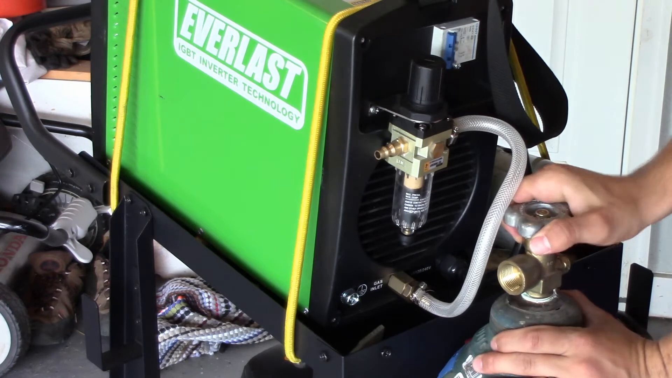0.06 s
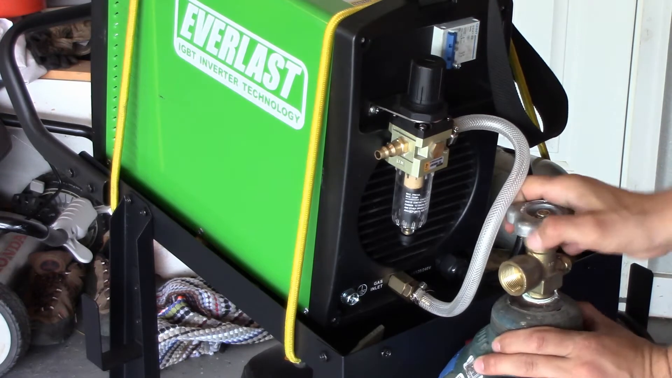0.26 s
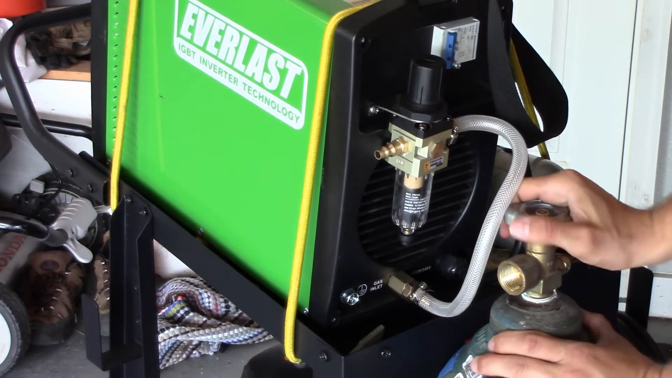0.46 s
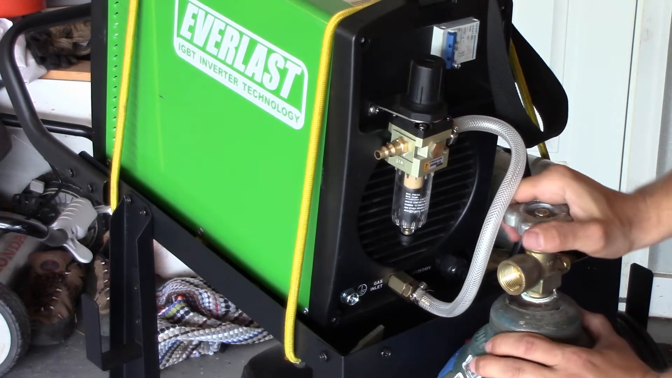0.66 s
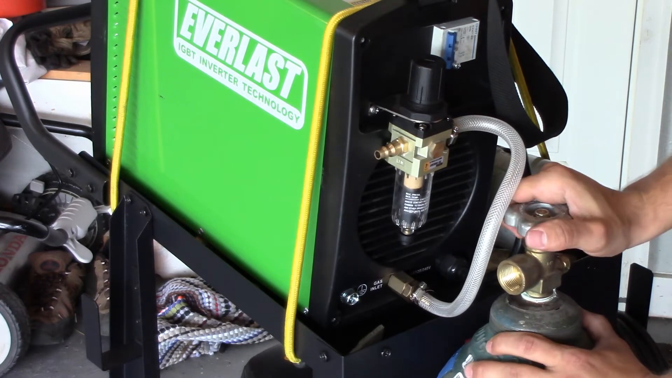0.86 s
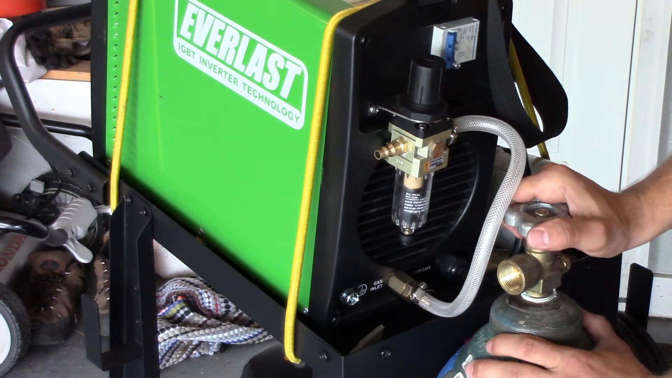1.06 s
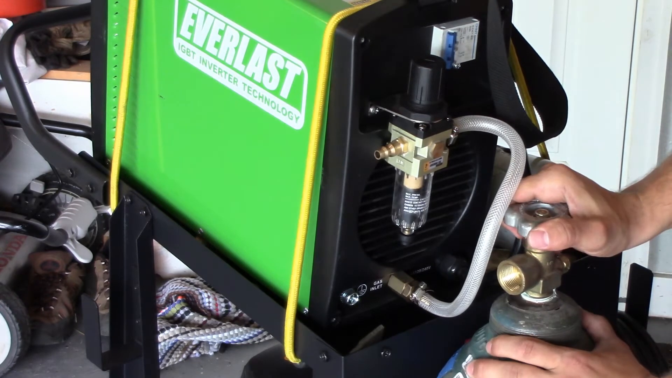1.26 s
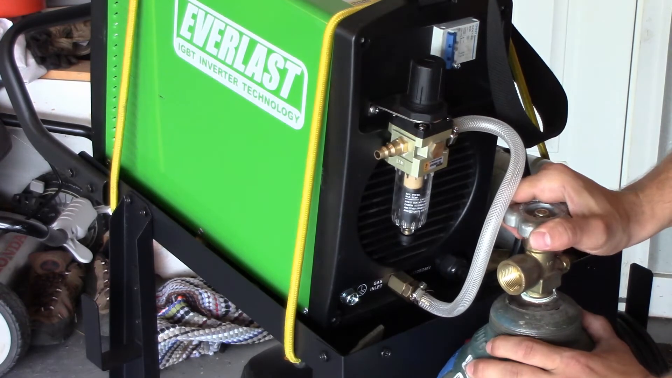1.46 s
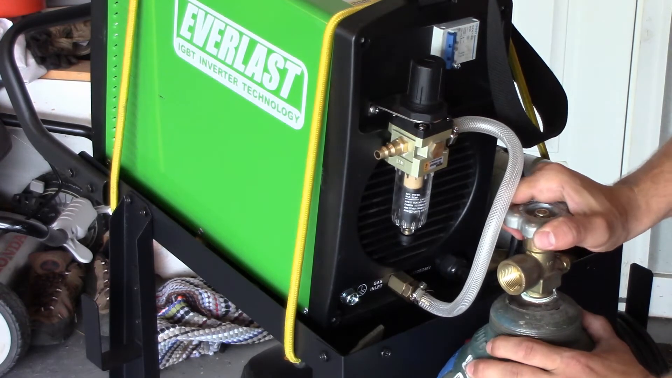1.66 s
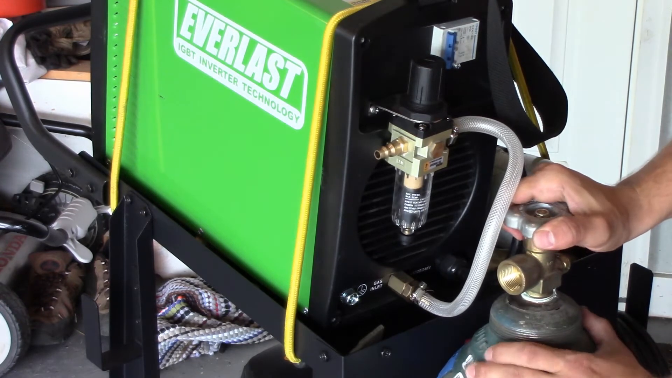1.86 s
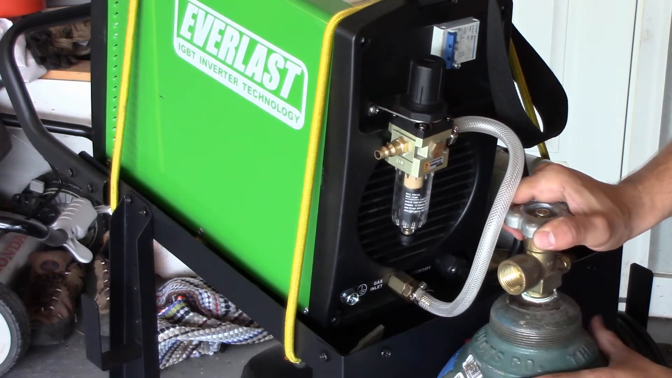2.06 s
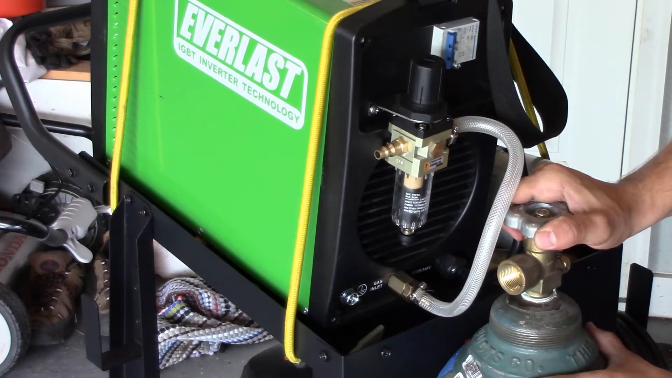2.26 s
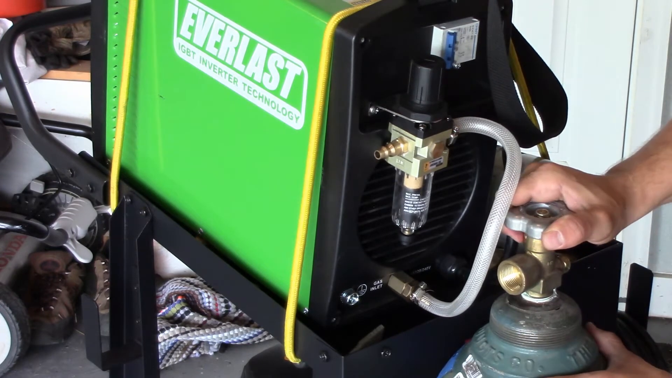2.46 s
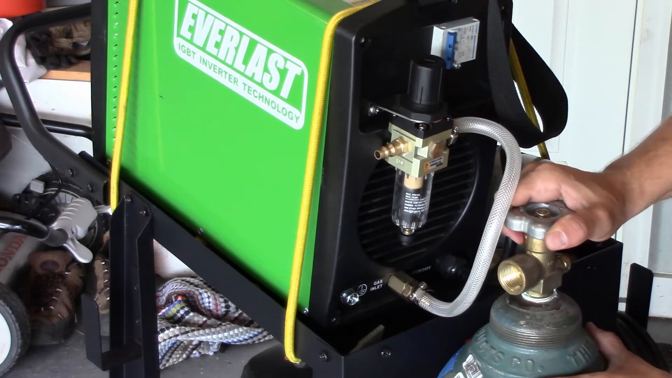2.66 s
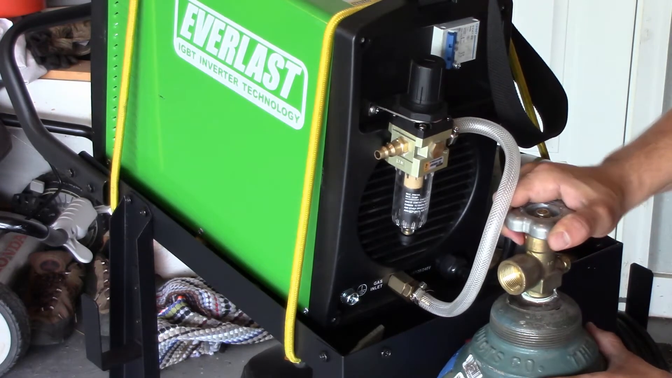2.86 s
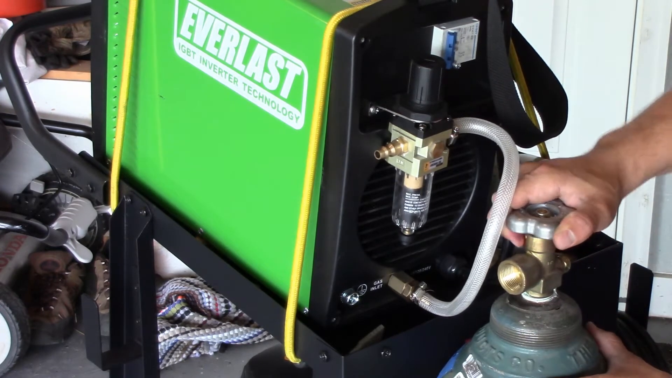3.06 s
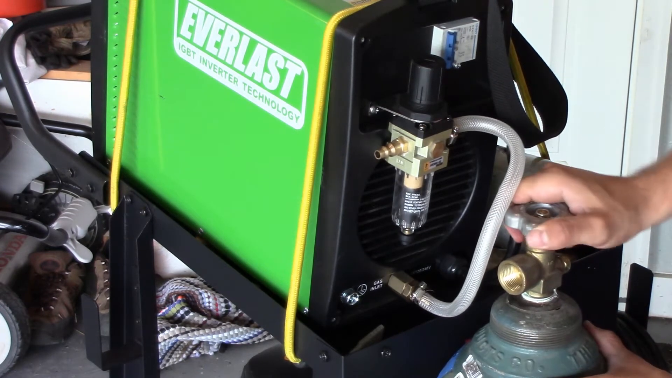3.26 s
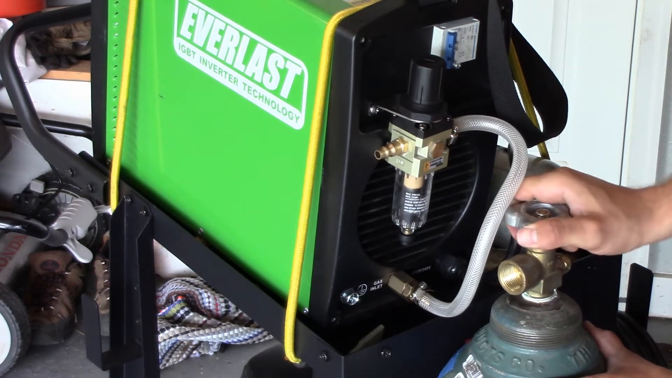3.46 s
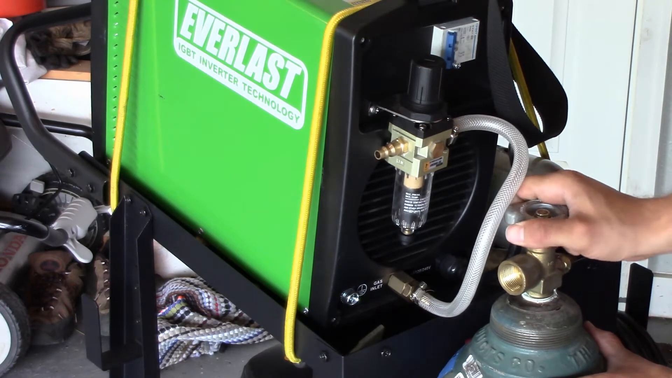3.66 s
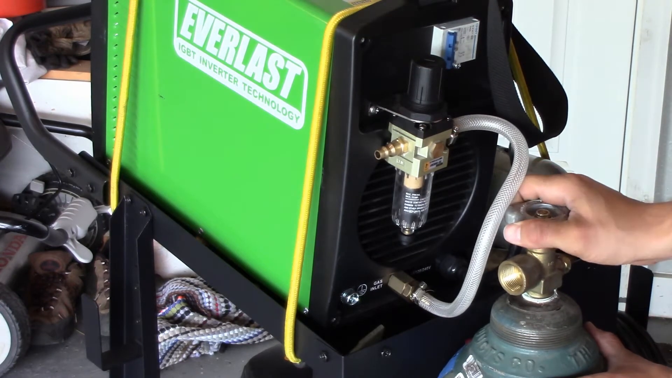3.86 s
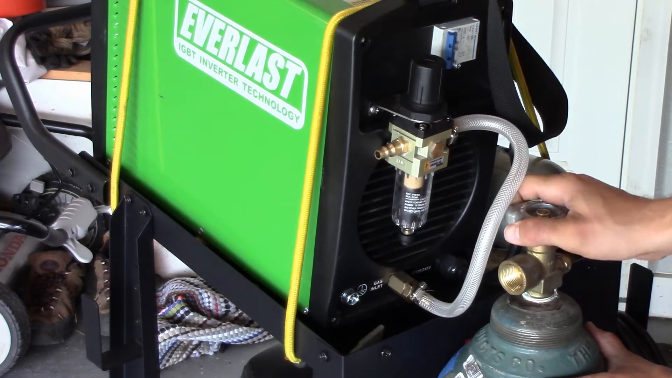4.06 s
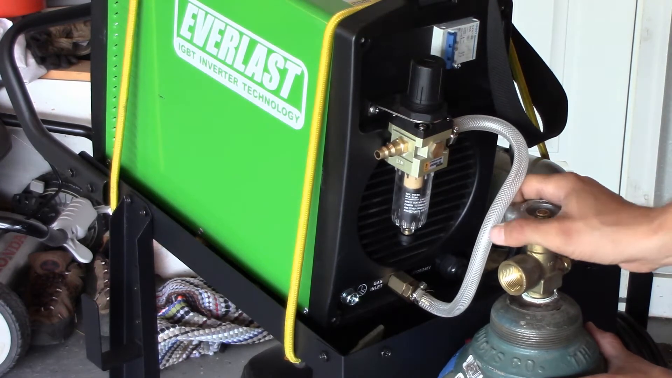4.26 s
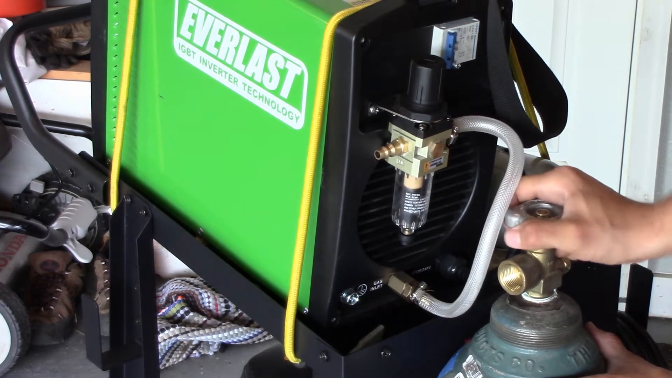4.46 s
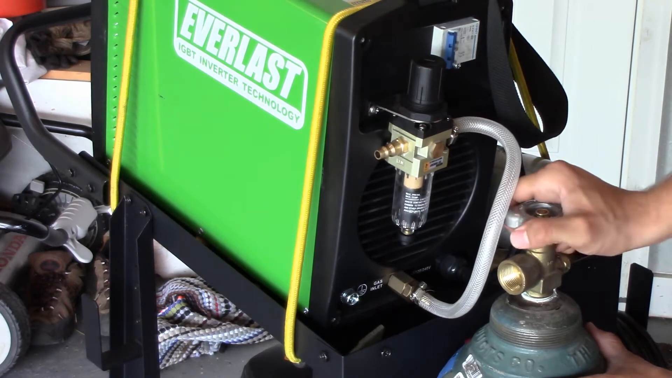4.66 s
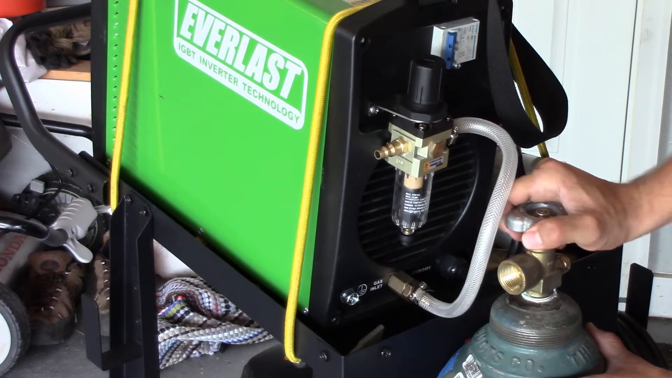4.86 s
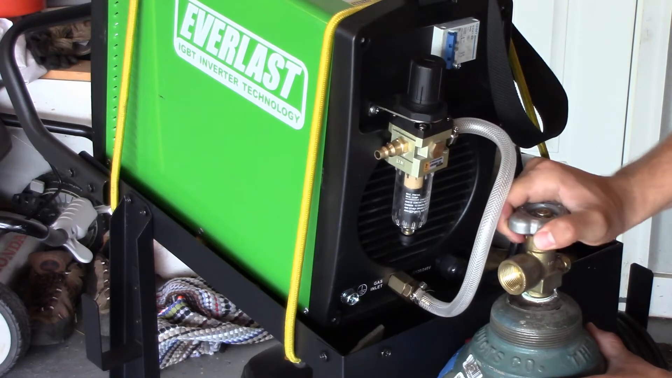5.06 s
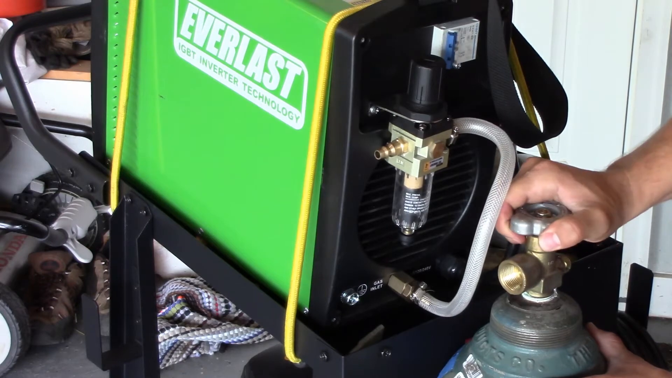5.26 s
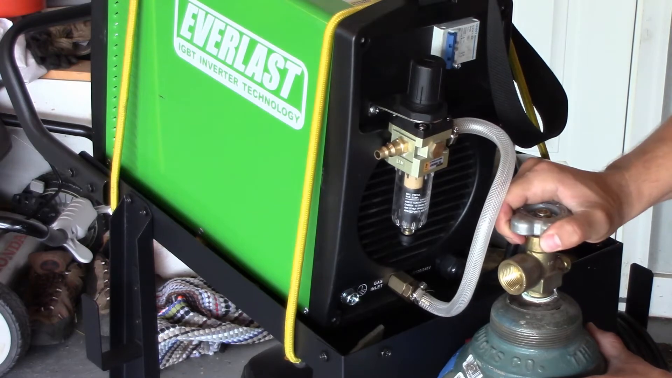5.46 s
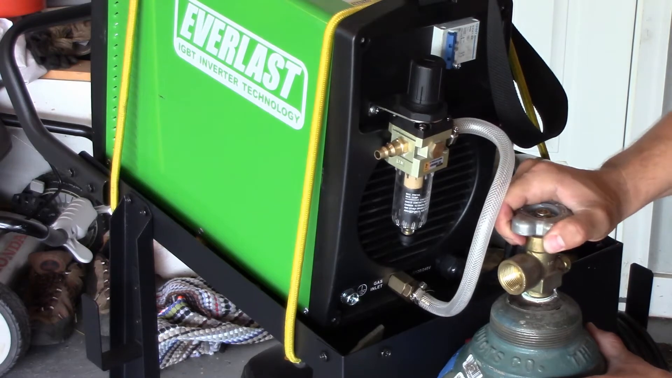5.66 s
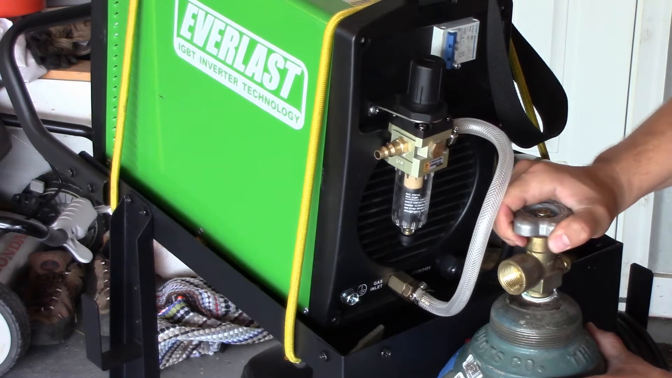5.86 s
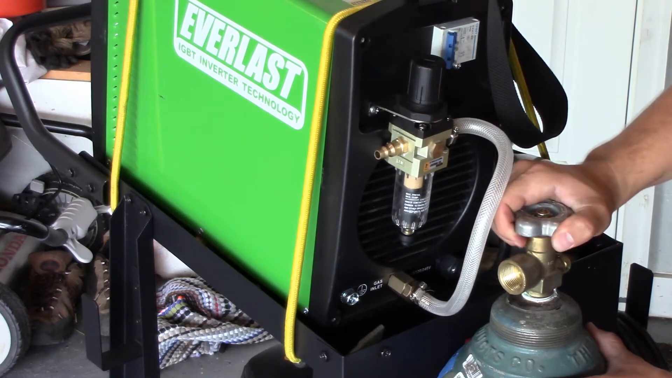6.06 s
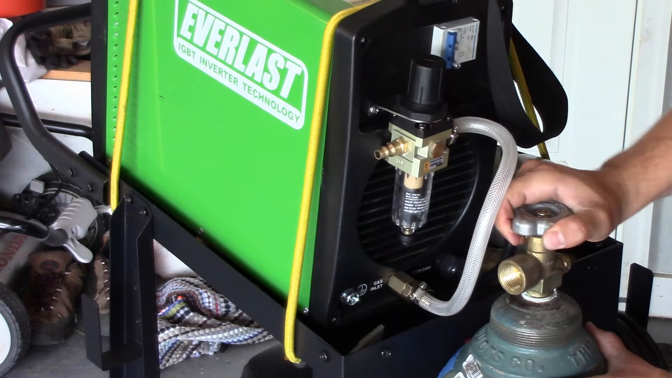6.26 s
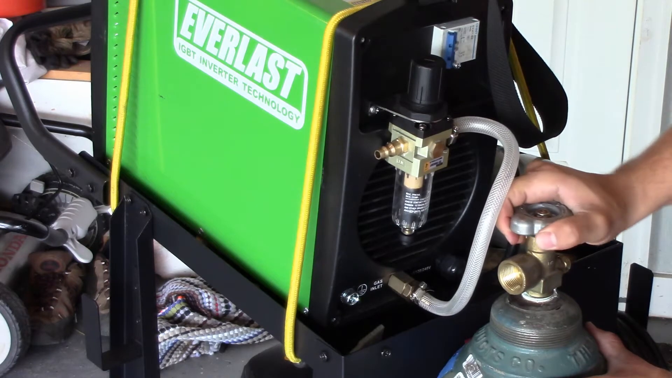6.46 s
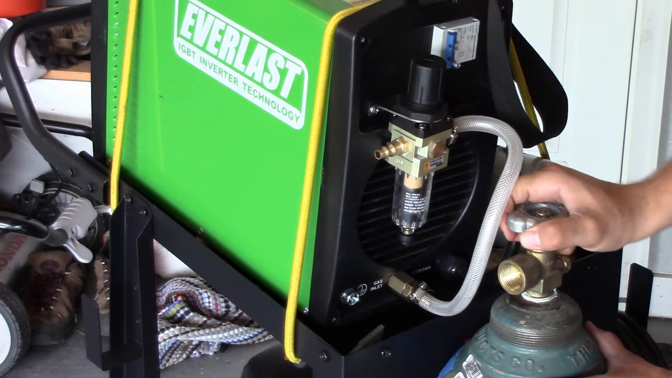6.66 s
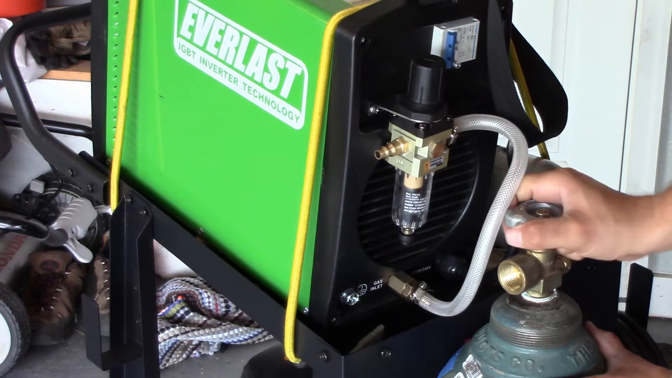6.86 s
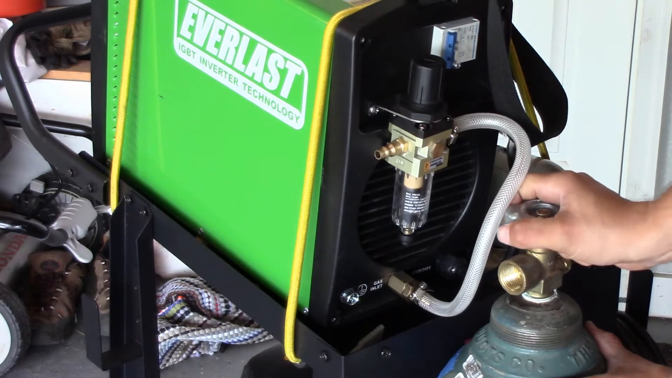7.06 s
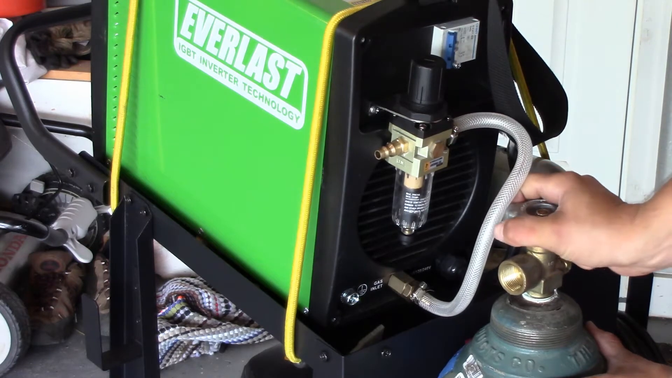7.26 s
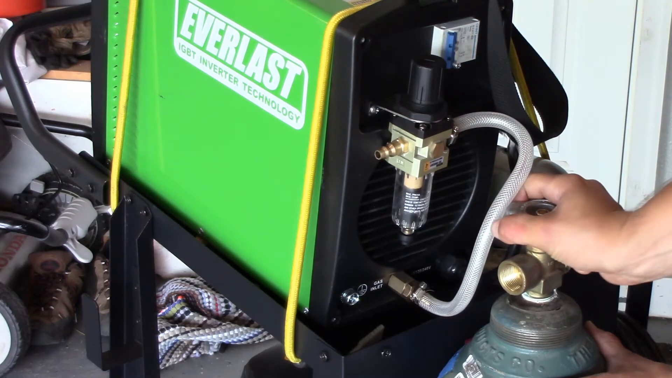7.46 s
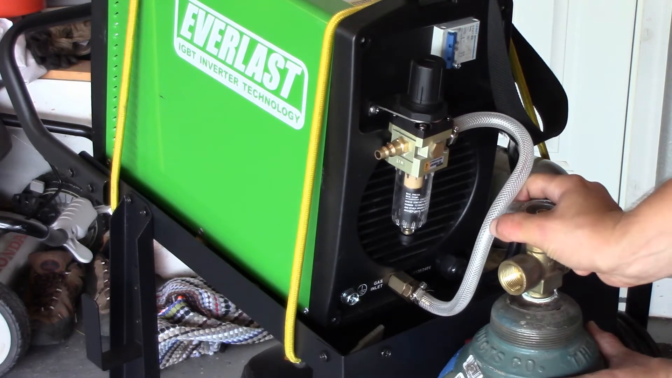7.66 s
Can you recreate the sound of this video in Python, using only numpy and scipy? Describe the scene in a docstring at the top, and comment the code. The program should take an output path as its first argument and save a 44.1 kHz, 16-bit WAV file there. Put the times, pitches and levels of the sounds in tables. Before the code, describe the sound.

Low garage hum with faint chirps, skin rubbing and ticks on metal, then three harsh ringing gas jets from a brass cylinder valve, the middle one very brief.

```python
"""Gas valve in a garage

A hand opens the valve of a gas cylinder three times; each jet is noise that rings the brass outlet.
Before that the hand rubs on the wheel: grainy noise with ticks. A machine hums in sine tones over
rumble and air noise, and birds chirp outside as narrow bands of noise that slide in pitch.
A limiter and a gain control hold the loud jet down, so the hum sinks while the valve is wide open."""
import sys
import numpy as np
from scipy import signal
from scipy.fft import rfft, irfft, next_fast_len
from scipy.io import wavfile
from scipy.ndimage import uniform_filter1d

SR = 44100
rng = np.random.default_rng(int(sys.argv[2]) if len(sys.argv) > 2 else 0)


def voltage_ratio(level):
    """Linear amplitude factor for a level in decibels (scalar or array-like)."""
    return 10 ** (np.asarray(level, float) / 20)


def output_pcm(signal):
    """Save a mono or channel-first signal as 16-bit PCM at the path in sys.argv[1].

    Samples are clipped to [-1, 1] before scaling.
    """
    pcm = np.clip(np.atleast_2d(signal).T, -1, 1) * 32767
    wavfile.write(sys.argv[1], SR, np.round(pcm).astype(np.int16))


N = 340361  # samples in the scene

# Levels are those of the sources, before the room and the gain controls. Colours are relative.
# thin whistles, perhaps birds; the one at 4.8 s is the valve seat just before its jet:
# t/s, length/s, level/dB, start f/Hz, end f/Hz
WHISTLES = [(0, 0.053, -59, 3940, 3820), (0.023, 0.18, -61, 4570, 4480), (1.325, 0.047, -59, 4540, 4620),
            (1.718, 0.089, -65, 3080, 3100), (1.86, 0.11, -56, 4250, 4150), (1.95, 0.045, -50, 4120, 4080),
            (2.0, 0.093, -58, 3420, 3370), (2.085, 0.032, -55, 2800, 2730), (2.275, .19, -60, 2450, 2250),
            (4.097, 0.095, -57, 2460, 2300), (4.316, 0.077, -55, 2190, 2250),
            (4.802, 0.13, -58, 3500, 3400)]
# hoarse chirps, mostly falling: t/s, length/s, level/dB, start f/Hz, end f/Hz
CHIRPS = [(1.34, 0.085, -50, 4070, 3370), (1.86, 0.083, -47.5, 3600, 3400), (1.95, .045, -45, 3820, 3550),
          (1.995, 0.041, -43, 3380, 3370), (2.06, 0.082, -59, 3380, 3240), (4.57, .035, -45, 3020, 3050)]

# strength of the hum, the shaft's second order: t/s, level/dB
HUM = [(0, -42.5), (1.1, -40.5), (1.65, -46.5), (2.3, -39.5), (3.6, -38.5), (4.2, -31), (5.1, -32),
       (5.47, -35.5), (5.75, -27.5), (6.9, -34.5), (7.3, -29.5), (7.72, -34)]
# weaker orders of the shaft: multiple of its speed, level/dB
WEAK_ORDERS = [(1, -72), (3, -49), (4, -48.5), (6, -62), (10, -58)]
# times when the rumble swells: t/s, length/s, level/dB
RUMBLE_SWELLS = [(1.8, .25, -44), (2.15, 0.47, -41), (3.3, 0.63, -51), (7.0, 0.87, -46)]
# colour of the rumble: f/Hz, level per Hz/dB
RUMBLE_COLOUR = [(25, -21), (40, 17), (50, 17), (63, 3.5), (90, 18), (130, 15.5), (200, -58)]
# fuzzy tones of the machine: f/Hz, width/Hz, level/dB
FUZZY_TONES = [(541, 96, -56.5), (770, 58, -51), (1038, 18, -54.5), (1131, 33, -58), (3600, 170, -76)]
# colour of the steady wash in the garage: f/Hz, level per Hz/dB
AIR_COLOUR = [(24, -24.5), (40, -21), (91, 5), (162, -13.5), (208, -3.5), (281, -10), (500, -14),
              (1170, -15), (1700, -19.5), (2300, -23), (3900, -24), (4700, -34.5), (7000, -40.5),
              (15700, -50)]
SHAFT_HZ = 51.35
RUMBLE_DB, AIR_DB = -47, -42.5  # steady parts
TONES_FADE_DB_PER_S = -2.27

# small ticks of wheel and valve: t/s, peak level/dB, f/Hz, cycles to die away by a factor e
TICKS = [(.016, -32, 8300, 1.2), (0.23, -13.5, 1510, 2.5), (0.279, -15, 3000, 0.3), (.355, -42, 12900, 1.5),
         (0.938, -37, 3920, 1), (2.435, -45, 3500, 2), (4.535, -47, 7000, 2.3), (4.575, -41, 3220, 4.4),
         (4.592, -44, 3300, 6.8), (4.635, -29, 5550, 2.2), (4.958, -2, 900, 0.075)]
# hand sliding on the wheel: t/s, length/s, skin hiss level/dB, dull scrape level/dB
STROKES = [(0.144, .24, -37.5, -39), (0.416, 0.16, -43, -45.5), (0.56, 0.22, -32.5, -35),
           (0.872, 0.11, -38, -49), (1.81, .35, -50.5, -67), (4.545, 0.071, -49, -59)]
# the grip catches and the scrape swells: t/s, length/s, level/dB
BITES = [(0.221, 0.11, -29.5), (0.645, 0.03, -34)]
# colour of the dull scrape: f/Hz, level per Hz/dB
SCRAPE_COLOUR = [(200, -18), (500, -8), (1000, -3.5), (1400, 0.5), (1900, -8), (3000, -34)]
# colour of the skin's hiss: f/Hz, level per Hz/dB
SKIN_COLOUR = [(1200, -36), (2000, -3), (2800, -2.5), (3600, 2.5), (4600, -6.5), (9600, -19.5),
               (13000, -21), (15700, -31)]
STROKE_POWER, BITE_RISE_S = 1.02, 0.006

# the wheel turns evenly open, is held, and turns evenly shut:
# t/s, opening/s, held/s, closing/s, full jet level/dB, widest colour share (0-1)
BURSTS = [(2.632, 0.33, 0.3, 0.26, 12, 0.93), (4.851, 0.032, 0.0089, 0.26, -1, 0.38),
          (5.59, 0.37, 0.5, 0.32, 16.5, 0.94)]
# colour of the jet with the valve barely cracked: f/Hz, level per Hz/dB
CRACKED = [(100, -34), (450, -36.5), (960, -25), (1900, -22), (2300, -16), (2700, -0.5), (3570, 1.5),
           (4000, -8.5), (4900, -20), (7700, -28), (8400, -18.5), (9700, -24), (10200, -24), (10800, -23),
           (11900, -22.5), (12600, -33), (15700, -37.5)]
# colour of the jet with the valve wide open: f/Hz, level per Hz/dB
WIDE = [(100, -43), (280, -22), (460, -25), (1190, -14), (2100, -7.5), (3010, 3), (3650, -1.5),
        (5120, -12.5), (7980, -13), (9250, -6.5), (10100, -12.5), (12000, -9.5), (13000, -13.5),
        (14500, -12), (15700, -24)]
# narrow rings of the brass outlet and the casing beside it: f/Hz, width/Hz, level/dB among the rings
OUTLET_RINGS = [(2300, 7.3, -45), (2590, 9, 11), (2840, 51, 0), (3070, 42, 5), (3040, 48, 3),
                (3375, 12, -3), (3530, 30, 13.5), (3530, 72, -20), (3676, 11, 10.5), (3750, 18, -23),
                (4200, 10, -7.5), (6180, 27, -8.5), (8900, 77, -9), (12130, 97, -30)]
OPENING_POWER, CLOSING_POWER, SHUT_DB = 2.55, 1.93, -77  # jet amplitude is a power of the wheel's turn
JUMP_S, SURGE_DB, SURGE_S = 0.024, 3, 0.03  # jump to the wide colour, with a brief surge
THREAD, CREEP, NARROWED = -0.36, 0.35, 0.4  # colour share at first crack, before the jump, at shutting
GUST_DB = 1.5  # unsteady flow, rms

# a band of hiss sweeps up as the valve jumps wide open:
# t/s, length/s, level/dB, start f/Hz, end f/Hz
SWEEPS = [(2.94, 0.079, 1, 5700, 8090), (5.97, 0.075, 4.5, 5550, 7640)]
# low puffs: two as the flow jumps, one under the knock at 4.958 s: t/s, level/dB, t60/s, top f/Hz
PUFFS = [(2.967, -9, 0.44, 1200), (4.958, -29, 0.17, 890), (5.982, -23, .25, 1600)]
# thin sizzle past the seat while the valve is not quite shut: t/s, level/dB
LEAK = [(5.05, -67), (5.15, -74), (5.3, -54), (5.45, -52.5), (5.58, -52.5), (5.66, -60)]
# bands of that sizzle: f/Hz, width/Hz, level/dB
LEAK_BANDS = [(3280, 890, -5.5), (8440, 940, -13), (10700, 3300, -18.5)]

# echoes from near surfaces: delay t/s, level/dB
ECHOES = [(.0041, -18.5), (.0046, -24), (.008, -19), (.0098, -12.5)]
# how long the garage rings: f/Hz, t60/s
GARAGE = [(300, 0.18), (1300, 0.66), (3500, 0.64), (9000, 0.51), (15000, 0.35)]
# smeared side signal against the middle: f/Hz, level/dB
SPREAD = [(60, -30), (150, -40.5), (300, -20.5), (700, -26), (1400, -39.5), (3000, -35), (6000, -30),
          (10000, -26.5), (14000, -17), (15700, -17)]
EDGE_HZ = 15760  # top of the band


def evened(x):
    """Scales a sound to rms 1."""
    return x / np.sqrt(np.mean(x ** 2) + 1e-20)


def read(points, hz):
    """Reads a curve between its points, on a logarithmic pitch scale."""
    f, value = np.transpose(points)
    return np.interp(np.log(hz + 1), np.log(f + 1), value)


def along(rows, t):
    """Reads every column of a table at the times t."""
    s, *columns = np.transpose(rows)
    return [np.interp(t, s, c) for c in columns]


def add(mix, s, sound):
    """Adds a sound into the mix at s seconds."""
    part = mix[round(s * SR):][:len(sound)]
    part += sound[:len(part)]


def resonate(x, hz, width):
    """Shifts the curve hz down to zero, smooths, and shifts back: a resonance of gain 1."""
    turn = np.exp(2j * np.pi * np.cumsum(hz * np.ones(len(x))) / SR)
    r = np.exp(-np.pi * width / SR)
    return 2 * (turn * signal.lfilter([1 - r], [1, -r], x / turn)).real


def wander(hz):
    """Slow chance of rms 1."""
    smooth = uniform_filter1d(rng.standard_normal(N), round(SR / hz / 4))
    return evened(signal.lfilter([1], [1, -np.exp(-2 * np.pi * hz / SR)], smooth))


def noise(colour_db, samples, patchy_db, size=512):
    """Random short-time spectra shaped by colour_db(hz, t), with drifting patches; rms 1 overall."""
    frames, hz = samples * 4 // size + 5, np.fft.rfftfreq(size, 1 / SR)
    a, b, patches = rng.standard_normal((frames, len(hz), 3)).T
    patches = evened(uniform_filter1d(uniform_filter1d(patches, 6, 0), 20, 1))
    t = np.arange(frames) * size / 4 / SR
    shape = voltage_ratio(colour_db(hz[:, None], t)) * np.ones(a.shape)
    shape = shape / np.linalg.norm(shape, axis=0)  # every moment equally strong before the patches
    spectra = (a + 1j * b) * shape * voltage_ratio(patchy_db * patches)
    return evened(signal.istft(spectra, nperseg=size, noverlap=size * 3 // 4)[1][:samples])


def still(points):
    """A colour that stays the same all the time."""
    return lambda hz, t: read(points, hz)


def narrow_noise(samples, hz, width):
    """Noise heard through two equal resonances in a row, at rms 1."""
    once = resonate(rng.standard_normal(samples), hz, width)
    return evened(resonate(once, hz, width))


def bands(table, samples):
    """Sums steady bands of noise."""
    return sum(voltage_ratio(db) * narrow_noise(samples, hz, width) for hz, width, db in table)


def glide(table, width):
    """Short bands of noise that slide from one pitch to another."""
    out = np.zeros(N)
    for s, length, db, start_hz, end_hz in table:
        hz = np.linspace(start_hz, end_hz, round(length * SR))
        band = narrow_noise(len(hz), hz, width)
        add(out, s, voltage_ratio(db) * band * signal.windows.tukey(len(hz), 0.4))
    return out


def swells(table, power):
    """Smooth humps over the whole scene, from rows of start, length and level."""
    out = np.zeros(N)
    for s, length, db in table:
        t = np.arange(0, length, 1 / SR)
        add(out, s, voltage_ratio(db) * abs(np.sin(np.pi * t / length)) ** power)
    return out


def chirps_and_whistles():
    """Birds' hoarse chirps as a fuzzy, throbbing resonance; thin whistles, one from the seat, as narrow ones."""
    throb = 1 + 0.14 * np.sin(2 * np.pi * 34 * np.arange(N) / SR)
    return glide(WHISTLES, 90) + throb * glide(CHIRPS, 600)


def machine():
    """Shaft orders on a slightly wavering speed, each fluttering on its own, over rumble and air noise."""
    t = np.arange(N) / SR
    speed_hz = SHAFT_HZ * (1 + 0.00373 * wander(3.03))
    angle = 2 * np.pi * np.cumsum(speed_hz) / SR
    out = voltage_ratio(along(HUM, t)[0] + 1.1 * wander(2.3)) * np.sin(2 * angle)
    for multiple, db in WEAK_ORDERS:
        flutter = voltage_ratio(db + 1.8 * wander(6.3))
        out += flutter * np.sin(multiple * angle + 2 * np.pi * rng.random())
    rumble = noise(still(RUMBLE_COLOUR), N, patchy_db=0, size=4096)
    out += (voltage_ratio(RUMBLE_DB) + swells(RUMBLE_SWELLS, 1.25)) * rumble
    out += voltage_ratio(TONES_FADE_DB_PER_S * t) * bands(FUZZY_TONES, N)
    return out + voltage_ratio(AIR_DB) * noise(still(AIR_COLOUR), N, patchy_db=-0.64, size=2048)


def hand():
    """Skin drags over metal: a grainy dull scrape and a finer hiss, with ticks."""
    grain = voltage_ratio(2.0 * evened(uniform_filter1d(rng.standard_normal(N), 60)))  # stick and slip
    scrape = noise(still(SCRAPE_COLOUR), N, patchy_db=3.0)
    skin = noise(still(SKIN_COLOUR), N, patchy_db=1.0)
    scrape_level = swells([(s, length, db) for s, length, _, db in STROKES], STROKE_POWER)
    skin_level = swells([row[:3] for row in STROKES], STROKE_POWER)
    for s, length, db in BITES:
        t = np.arange(0, length, 1 / SR)
        add(scrape_level, s, voltage_ratio(db) * np.minimum(t / BITE_RISE_S, 1) * (1 - (t / length) ** 2))
    out = evened(grain) * (scrape_level * scrape + skin_level * skin)
    for s, db, hz, cycles in TICKS:
        turns = np.arange(1000) / SR * hz
        tick = np.sin(2 * np.pi * turns) * np.exp(-turns / cycles)
        add(out, s, -voltage_ratio(db) * tick / tick.max())
    return out


def jet(open_s, held_s, close_s, full_db, widest):
    """Turbulent noise that broadens as the valve opens and rings the outlet."""
    total_s = open_s + held_s + close_s
    t = np.arange(0, total_s, 1 / SR)
    knots = np.cumsum([0, max(open_s - 0.42 * JUMP_S, open_s / 2), JUMP_S])

    def left(s):  # share of the wheel's turn still open while closing
        return np.clip((total_s - s) / close_s, 0, 1)

    def colour(hz, s):
        widening = np.interp(s, knots, [THREAD, CREEP, widest])
        narrowing = NARROWED + (widest - NARROWED) * left(s) ** 0.44
        share = np.minimum(widening, narrowing)
        return read(CRACKED, hz) + share * (read(WIDE, hz) - read(CRACKED, hz))

    hiss = noise(colour, len(t), patchy_db=1.67)
    rings = sum(voltage_ratio(db) * evened(resonate(hiss, hz, width)) for hz, width, db in OUTLET_RINGS)
    flow = np.minimum(t / open_s, 1) ** OPENING_POWER * left(t) ** CLOSING_POWER
    surge_db = SURGE_DB * np.exp(-((t - open_s) / SURGE_S) ** 2)
    gust_db = GUST_DB * wander(14.2)[:len(t)]
    level = voltage_ratio(SHUT_DB) + voltage_ratio(full_db + surge_db + gust_db) * flow
    return level * evened(hiss + voltage_ratio(-10.0) * evened(rings))


def seat():
    """The leak past the valve seat, sweeps when the flow jumps, and low puffs at two jumps and one knock."""
    out = glide(SWEEPS, 1900)
    t = np.arange(LEAK[0][0], LEAK[-1][0], 1 / SR)
    add(out, t[0], voltage_ratio(along(LEAK, t)[0]) * evened(bands(LEAK_BANDS, len(t))))
    t = np.arange(SR // 2) / SR
    for s, db, t60, top_hz in PUFFS:
        low_band = signal.butter(2, [130, top_hz], "band", fs=SR, output="sos")
        puff = evened(signal.sosfilt(low_band, rng.standard_normal(len(t))))
        add(out, s, voltage_ratio(db - 60 * t / t60) * np.minimum(t / 0.0023, 1) * puff)
    return out


def tail():
    """Sparse taps of random sign, one in every 20 samples, each band dying at its own speed."""
    taps, at = np.zeros(SR), np.arange(500, SR - 20, 20)
    taps[at + rng.integers(0, 20, len(at))] = rng.choice([-1., 1.], len(at))
    hz, t, z = signal.stft(taps, SR, nperseg=256)
    out = signal.istft(z * voltage_ratio(-60 * t / read(GARAGE, hz)[:, None]), SR, nperseg=256)[1]
    return out / np.linalg.norm(out)


def garage(x):
    """Direct sound, near echoes and the tail, scaled together to unit energy."""
    room = voltage_ratio(-12.5) * tail()
    room[0] = 1
    for s, db in ECHOES:
        room[round(s * SR)] += voltage_ratio(db)
    return signal.fftconvolve(x, room / np.linalg.norm(room))[:N]


def scene():
    """Everything is near the middle; a faint smeared copy makes the side."""
    near = chirps_and_whistles() + hand() + seat()
    for start, *turning in BURSTS:
        add(near, start, jet(*turning))
    near = garage(near)
    mid = near + machine()
    size = next_fast_len(N + SR)
    smear = rfft(tail()[500:2500], size)
    smear = smear / np.sqrt(np.mean(abs(smear) ** 2))
    smear = smear * voltage_ratio(read(SPREAD, np.fft.rfftfreq(size, 1 / SR)))
    side = irfft(rfft(mid, size) * smear, size)[:N]
    side = side - 0.054 * near  # all but the machine sits a touch right
    return np.array([mid + side, mid - side])


def excess(power_db, knee_db, recovery_db):
    """dB above the knee, caught at once and let go at recovery_db a second."""
    fall = np.arange(N) * recovery_db / SR
    return np.maximum(np.maximum.accumulate(power_db + fall) - fall - knee_db, 0)


def roll_off(x):
    """The treble ends steeply here."""
    return signal.sosfilt(signal.butter(12, 16550, fs=SR, output="sos"), x)


def record(dry):
    """A quick limiter that hears treble more strongly, a sluggish gain control, hiss, soft clip, band edge."""
    sensed = signal.lfilter([1, -0.45], [1], dry.mean(0))
    power_db = 10 * np.log10(abs(uniform_filter1d(sensed ** 2, 900)) + 1e-12)
    quick_db = 0.97 * uniform_filter1d(excess(power_db, knee_db=-13.0, recovery_db=150.), 300)
    lag = np.exp(-1 / (0.4 * SR))  # the slow control follows over 0.4 s
    slow_excess = excess(power_db - quick_db, knee_db=-30.5, recovery_db=100.)
    slow_db = 0.12 * signal.lfilter([1 - lag], [1, -lag], slow_excess)
    held = dry / voltage_ratio(quick_db + slow_db)
    held = held + voltage_ratio(-62) * rng.standard_normal(dry.shape)  # each channel has its own preamp hiss
    clipped = held / (1 + (held / 0.95) ** 6) ** (1 / 6)
    edge = signal.firwin(511, EDGE_HZ, window=("kaiser", 11), fs=SR)
    mix = signal.oaconvolve(clipped, edge[None], "same")
    return roll_off(mix)


dry = scene()
out = record(dry)
output_pcm(out)
```